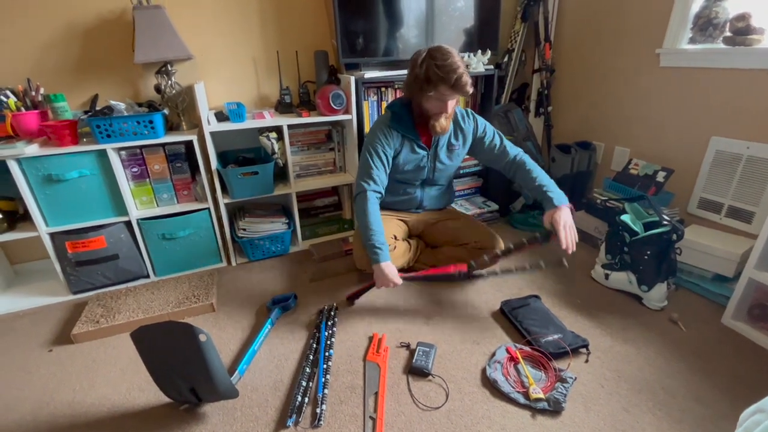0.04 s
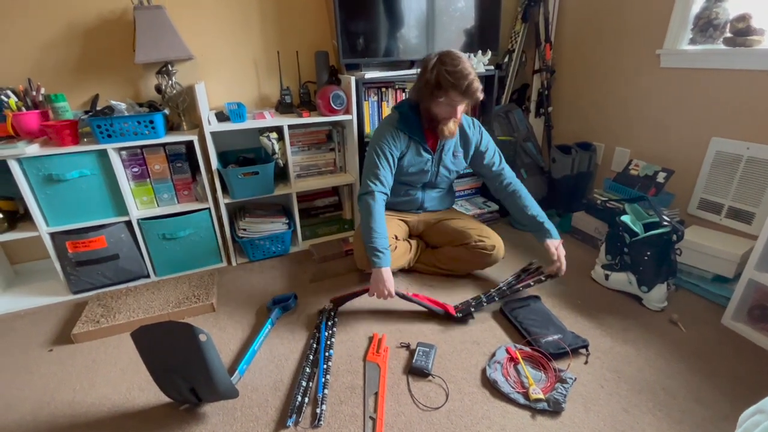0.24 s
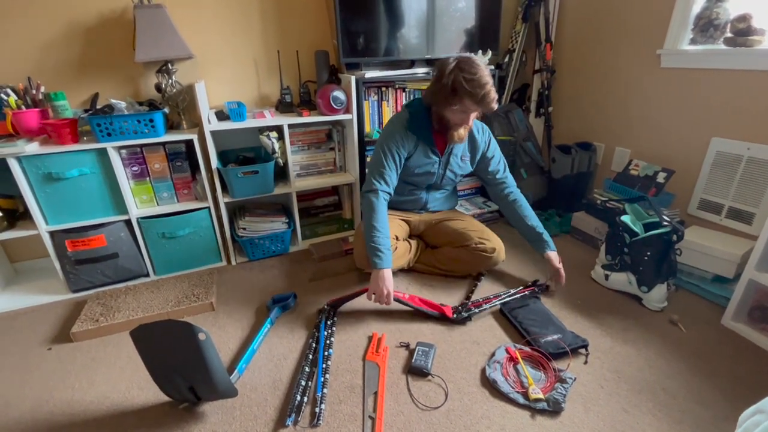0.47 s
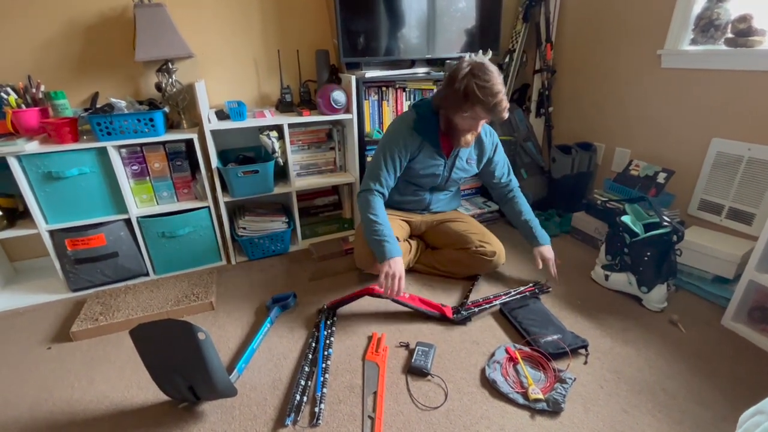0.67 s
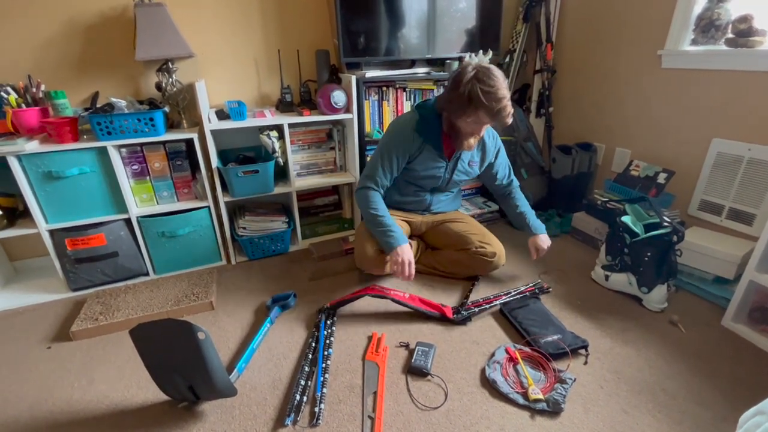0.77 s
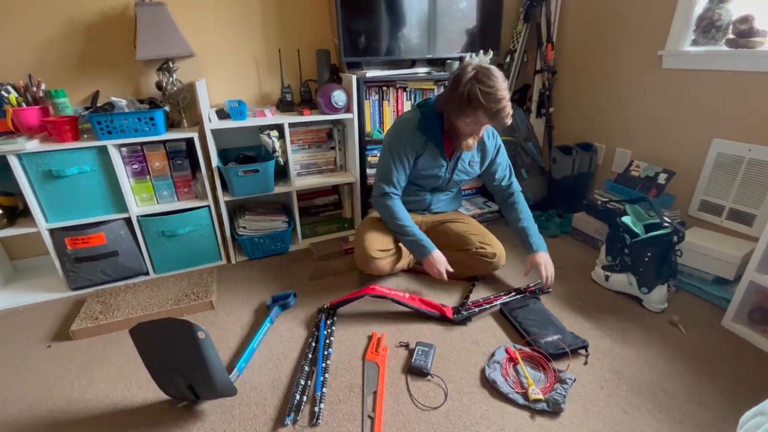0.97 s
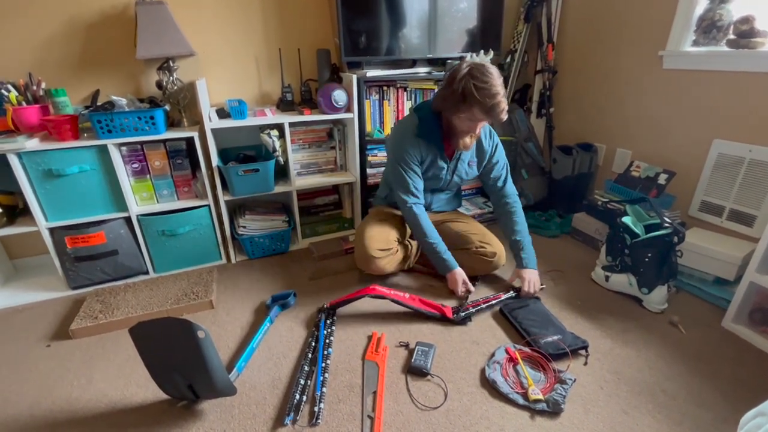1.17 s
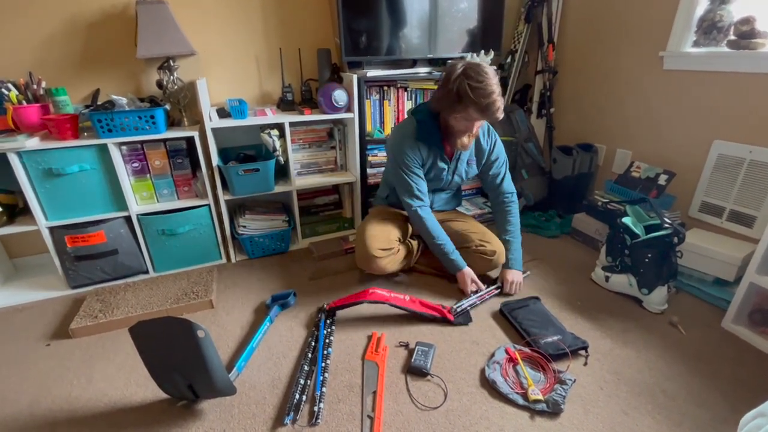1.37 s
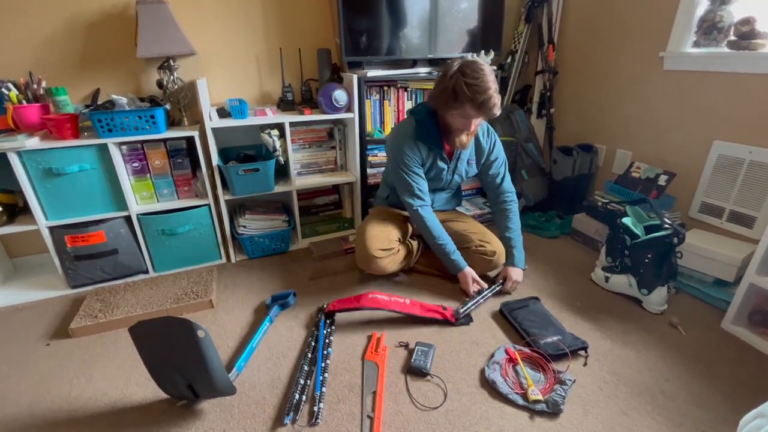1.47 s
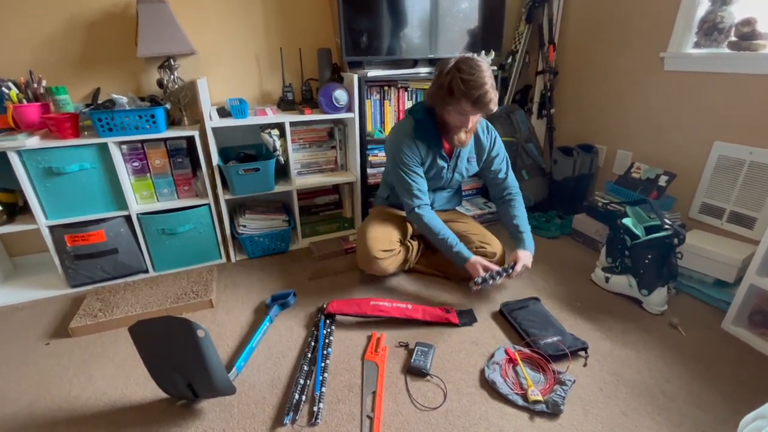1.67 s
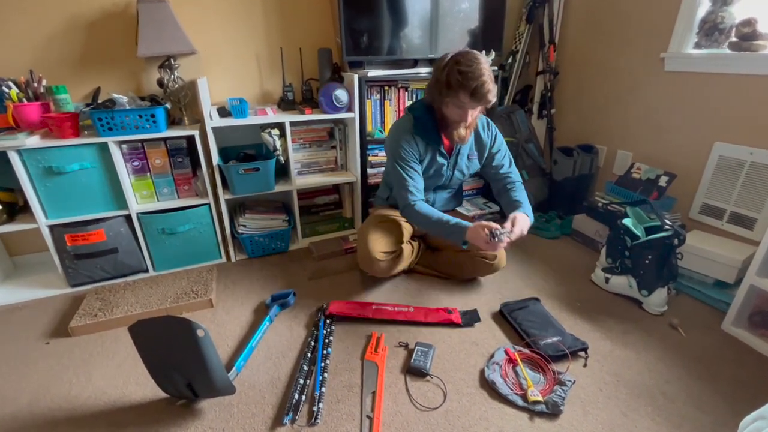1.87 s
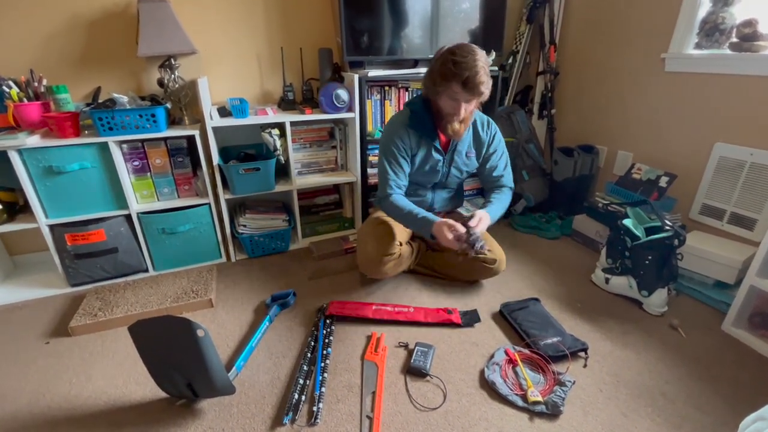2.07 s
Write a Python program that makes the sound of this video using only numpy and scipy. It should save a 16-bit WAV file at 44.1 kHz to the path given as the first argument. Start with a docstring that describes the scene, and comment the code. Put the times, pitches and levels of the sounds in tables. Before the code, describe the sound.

Thin metal tubes knock together from the start, landing on carpet at about 0.1 s with a loud bright clatter and dull thud. A smaller bounce follows at 0.35 s, light clicks near 0.5 s, then near quiet. Cloth rustles softly around 0.9 s. From 1.1 s to the end, at about 2 s, hands rub and gather the tubes with short irregular clinks. Small room, faint low hum and hiss.

```python
"""Aluminium tubes dropped and gathered

A bundle of thin tube segments drops on a carpet, bounces, then is gathered up by hand in a small room.
Each knock chatters briefly and excites the bending modes of several slightly unlike tubes; small ticks
rattle between knocks. Damped tones make the landing thuds and shaped noise the cloth rustle, hand rub,
house hum and hiss. Two microphone ports hear it with their own colour."""
import sys
import numpy as np
from scipy import signal
from scipy.fft import rfft, irfft
from scipy.io import wavfile
from scipy.ndimage import uniform_filter1d

SR = 44100
rng = np.random.default_rng(int(sys.argv[2]) if len(sys.argv) > 2 else 0)


def to_wav(sig):
    """Store sig (one row per channel, or 1-D mono) as 16-bit WAV at the path in sys.argv[1].

    Samples outside -1..1 are clipped; the rate is SR.
    """
    pcm = np.clip(np.atleast_2d(sig), -1, 1) * 32767
    pcm = np.round(pcm).astype(np.int16)
    wavfile.write(sys.argv[1], SR, pcm.T)  # frames by channels


N = 93668  # samples

# Hum spectrum: [f/Hz, relative spectral level/dB]
HUM_SPECTRUM = [(25, -39.5), (43, -2.5), (108, 7.5), (167, -4.5), (237, -7), (454, -24.5), (600, -58)]
# Hiss spectrum: [f/Hz, relative spectral level/dB]
HISS_SPECTRUM = [(240, -71), (400, -33.5), (2030, -23.5), (2290, -22.5), (11900, -34), (15500, -57.5)]
HUM_DB, HISS_DB = -62.5, -66  # rms; the hum then wavers about its level
# Cloth rustle envelope, before its random wander: [t/s, rms level/dB]
RUSTLE_ENVELOPE = [(0.601, -91), (.8, -69.5), (.9, -59), (.96, -56), (1.074, -60.5)]
# Cloth noise spectrum: [f/Hz, relative spectral level/dB]
RUSTLE_SPECTRUM = [(150, -41), (250, -5.5), (692, -8), (897, -11), (1180, -2), (1990, -4.5), (9390, -3.5),
                   (12800, -13.5), (15500, -39)]
# Hands sliding on carpet and tubes: centre and spread in s, noise rms in dB before the swell, band in Hz
RUB_S, RUB_SPREAD_S, RUB_DB, RUB_BAND_HZ = 1.183, 0.073, -63, (183, 600)

# Bundle landing on the carpet: [t/s, amplitude before envelope and room/dB, f/Hz, t60/s]
LANDINGS = [(.1105, -8.5, 710, 0.01), (.122, -37.5, 528.5, 0.2), (0.118, -36.5, 155.6, 0.1),
            (0.139, -24.5, 238, 0.043), (0.151, -32.5, 91, 0.047), (0.346, -29.5, 257.6, 0.045),
            (0.362, -44, 101, .12)]

# Bending modes of one tube: [f/Hz, relative level/dB]
TUBE_MODES = [(1030, -6), (1500, -23.5), (2050, 2), (2750, -39), (3200, 7.5), (3850, -34), (4750, 10.5),
              (5300, 9), (6000, 10), (6800, 13.5), (8600, 6), (9300, 5.5), (10900, -6.5), (13200, -1.5)]
# Loose tubes jostling, level before the room: [t/s, level/dB]
RATTLE_ENVELOPE = [(0.044, -39.5), (0.095, -45.5), (0.109, -27), (0.201, -42), (0.3, -43.5), (.335, -50),
                   (0.411, -38), (0.502, -70), (1.159, -86), (1.245, -40), (1.28, -44), (1.35, -40.5),
                   (1.585, -61), (1.6, -47), (1.654, -60.5), (1.718, -52), (1.885, -70), (1.911, -49),
                   (1.98, -72.5), (2.04, -52.5)]
TICKS_PER_S, TICK_SCATTER_DB = 1100, 3.5  # the scatter sets an exponential spread of levels
# Knocks of tube on tube, peak before the low cut and room; the rows at 0.1233 s and 1.3227 s are # strong near-
# wall reflections of the knocks about 11 ms before them: # [t/s, peak level/dB, low-mode level/dB, high-mode
# level/dB, most strongly struck f/Hz]
TUBE_KNOCKS = [(0.0004, -17, -3, -1, 6300), (0.0229, -13, -5, 12.5, 10140), (0.1123, -3.5, 6, 12.5, 9100),
               (0.1233, -7.5, -35, 8, 10040), (0.1358, -15, 11.5, -18, 6960), (0.1465, -9.5, -11, 28, 8900),
               (0.1612, -21, 8, 10, 9050), (0.2156, -15, -3, 9, 3330), (0.2403, -19.5, 6, 10, 3100),
               (0.3435, -9, -4.5, 15, 6000), (0.3526, -18.5, 0, 40, 8240), (0.356, -16.5, -12, -14.5, 5300),
               (0.4877, -20, 0.5, -1.5, 3370), (0.5136, -25, 9.5, 11, 3070), (0.6787, -44, 23.5, 22, 2900),
               (1.0806, -21.5, 2.5, 4.5, 3060), (1.1707, -17, 4, 12.5, 4480), (1.2525, -22.5, 7, 13, 5230),
               (1.293, -18.5, 13, 12.5, 4690), (1.3115, -15, -4, 5.5, 8770), (1.3227, -24.5, 6, -11, 2980),
               (1.3728, -15.5, -10.5, 12.5, 9100), (1.3918, -13, 10.5, 16, 4870),
               (1.4537, -17, -14, -7, 3550), (1.5139, -17, -1, 14, 9600), (1.5225, -23.5, -5.5, -6, 5070),
               (1.6047, -20.5, -1, 3.5, 6060), (1.6435, -27, 10, 4, 4700), (1.7296, -20, -4, 9.5, 9260),
               (1.7327, -13.5, -6, 12.5, 4920), (1.7553, -24.5, 12, 10, 4570), (1.8364, -34, 2, -7, 6800),
               (1.9703, -40, -8, 10, 4690), (2.0119, -26, -7, 4, 2050), (2.0712, -18, -11.5, 8, 4950)]
# Contact crack spectrum: [f/Hz, relative spectral level/dB]
CRACK_SPECTRUM = [(600, -43), (1400, 3), (2030, 5.5), (8090, -6.5), (8940, 5.5), (13300, -56),
                  (16000, -46.5)]
SEGMENTS = 7  # tubes ringing in each knock
DETUNE, GRIP_DETUNE = .035, .025  # fractions of f: tube to tube, and knock to knock
MODE_SCATTER_DB, PORT_SCATTER_DB = 4, 4.5
LOW_HZ, HIGH_HZ = 3600, 7600  # edges of the low-mode and high-mode groups
STRUCK_DB, STRUCK_OCTAVES = 8, .13  # emphasis around the most strongly struck frequency
RING_T60_S = .028  # at 3 kHz; longer below, shorter above
CRACK_DB, CRACK_S = -3, .0004  # peak relative to the ring's peak, time constant
CONTACT_S = .0003  # onset time of a ring
CLUSTER_S, CHATTER_S, CHATTER_DB = .0018, .016, -15  # mean delays; largest chatter contact

# Port colour, half applied to each side: [f/Hz, left minus right level/dB]
PORT_COLOUR = [(250, -2), (700, -6), (2000, -5), (4400, 14), (8100, -10), (13000, -0.5)]
PORT_LAG_S = .0004  # direct sound arrives later at the left port
ROOM_DB, ROOM_T60_S, ROOM_TREBLE_T60_S = -1.5, .22, .23  # reflected level relative to direct
WALL_S, WALL_SPREAD_S, WALL_DB = .0112, .0016, 5  # bunch of near echoes
TOP_HZ = 16300


def undb(db):
    """Logarithmic level: 20 dB is a factor of ten in amplitude."""
    return 10 ** (np.asarray(db) / 20)


def colour(x, table, share=1):
    """Linear filtering: weight the spectrum by levels interpolated over log frequency."""
    hz, db = np.array(table).T
    n = x.shape[-1]
    f = np.maximum(np.arange(n // 2 + 1) * SR / n, 1)
    # below the first point the level steps down 4 dB
    gain_db = np.interp(np.log(f), np.log(hz), db, left=db[0] - 4.0)
    return irfft(rfft(x) * undb(share * gain_db), n)


def level(x, db):
    """Mean-square normalisation: set the rms level."""
    return x * undb(db) / np.sqrt(np.mean(x ** 2))


def walk(rate):
    """Low-passed randomness: twice-averaged noise wanders smoothly with unit rms."""
    k = int(SR / rate)
    smooth = uniform_filter1d(rng.standard_normal(N), k)
    return level(uniform_filter1d(smooth, k), 0)


def decay(t, t60):
    """Exponential damping: amplitude falls 60 dB in t60."""
    return np.exp(-np.log(1000) * t / t60)


def add(out, x, s):
    """Superposition: sum a sound into the output from time s."""
    i = int(s * SR)
    out[..., i:i + x.shape[-1]] += x[..., :N - i]


def background():
    """Partial coherence: a wavering low hum mostly shared by both ports, over independent hiss."""
    mid, side = colour(rng.standard_normal((2, N)), HUM_SPECTRUM)
    stereo_hum = mid + .4 * side * np.array([[1], [-1]])
    hum = level(stereo_hum, HUM_DB) * undb(2 * walk(6))
    hiss = level(colour(rng.standard_normal((2, N)), HISS_SPECTRUM), HISS_DB)
    return hum + hiss


def rustle():
    """Modulated friction noise: grainy cloth sound as the arms move."""
    s, db = np.array(RUSTLE_ENVELOPE).T
    envelope_db = np.interp(np.arange(N) / SR, s, db, left=-120, right=-120)
    envelope = undb(envelope_db + 2.0 * walk(36))
    return level(colour(rng.standard_normal((2, N)), RUSTLE_SPECTRUM), 0) * envelope


def rub():
    """Sliding friction: a dull uneven band of noise swells while the bundle is gathered."""
    band = signal.butter(2, RUB_BAND_HZ, "band", fs=SR, output="sos")
    noise = signal.sosfilt(band, rng.standard_normal((2, N)))
    swell = np.exp(-((np.arange(N) / SR - RUB_S) / RUB_SPREAD_S) ** 2)
    return level(noise, RUB_DB) * swell * undb(4.9 * walk(34))


def thuds():
    """Damped oscillation: each landing is a decaying tone blurred by a random phase walk."""
    out, t = np.zeros(N), np.arange(8000) / SR
    for s, db, hz, t60 in LANDINGS:
        wobble = np.cumsum(rng.standard_normal(len(t))) * 0.0034  # rad
        tone = np.sin(2 * np.pi * hz * t + wobble)
        onset = 1 - np.exp(-t / 0.003)
        add(out, undb(db) * tone * onset * decay(t, t60), s)
    return out


def ring_t60(hz):
    """Frequency-dependent damping: decay time falls as the inverse root of frequency."""
    return RING_T60_S * np.sqrt(3000 / hz)


def rattle():
    """Random impulse excitation: six tick trains each ring their own detuned set of tubes."""
    out, t, groups = 0, np.arange(2000) / SR, 6
    s, level_db = np.array(RATTLE_ENVELOPE).T
    hz, db = np.repeat(np.array(TUBE_MODES), 3, axis=0).T
    fades = decay(t, ring_t60(hz)[:, None])
    for _ in range(groups):
        u, mode = rng.random((2, N)), rng.standard_normal((3, len(hz)))
        tick_size = undb(-TICK_SCATTER_DB * np.log(1 - u[1]))
        ticks = (u[0] < TICKS_PER_S / groups / SR) * tick_size
        mode_hz = hz * (1 + DETUNE * mode[0])
        rings = np.sin(2 * np.pi * mode_hz[:, None] * t) * fades
        port_gains = undb(db + 2 * PORT_SCATTER_DB * mode[1:])
        out = out + signal.fftconvolve(ticks[None], port_gains @ rings, axes=1)[:, :N]
    return level(out, 0) * undb(np.interp(np.arange(N) / SR, s, level_db))


def strike_tilt(f, low_db, high_db, struck_hz):
    """Selective excitation: a strike weights low modes, high modes and a narrow struck region, in dB."""
    low = low_db / (1 + (f / LOW_HZ) ** 6)
    high = high_db / (1 + (HIGH_HZ / f) ** 8)
    struck = STRUCK_DB * np.exp(-(np.log2(f / struck_hz) / STRUCK_OCTAVES) ** 2)
    return low + high + struck


def contacts():
    """Repeated impact: a cluster of contacts and a faint dense chatter follow the first blow."""
    u, train = rng.random((3, 60)), np.zeros(5000)
    in_cluster = np.arange(60) < 9
    when = -np.log(1 - u[0]) * np.where(in_cluster, CLUSTER_S, CHATTER_S)
    size = np.where(in_cluster, .8, undb(CHATTER_DB)) * u[1] * np.sign(u[2] - .5)
    np.add.at(train, np.clip(when * SR, 0, 4999).astype(int), size)
    train[0] = 0.93  # first blow
    return train


def knocks():
    """Modal superposition: contacts convolved with tube rings and a short noisy crack, then a low cut."""
    out, t = np.zeros((2, N)), np.arange(3000) / SR
    hz, db = np.repeat(np.array(TUBE_MODES), SEGMENTS, axis=0).T
    hz = hz * (1 + DETUNE * rng.uniform(-0.82, 1, len(hz)))
    fades = decay(t, ring_t60(hz)[:, None]) * (1 - np.exp(-t / CONTACT_S))
    crack_t = t[:2048]
    crack_shape = crack_t * np.exp(-crack_t / CRACK_S)
    for s, peak_db, low_db, high_db, struck_hz in TUBE_KNOCKS:
        strike = low_db, high_db, struck_hz
        mode = rng.standard_normal((4, len(hz)))
        train = contacts()
        noise = rng.standard_normal((2, 2048))
        mode_hz = hz * (1 + GRIP_DETUNE * mode[0])
        rings = np.sin(2 * np.pi * mode_hz[:, None] * t) * fades
        mode_db = db + strike_tilt(hz, *strike) + MODE_SCATTER_DB * mode[1]
        ring = undb(mode_db + PORT_SCATTER_DB * mode[2:]) @ rings
        ring /= np.abs(ring).max()
        spectrum = [(f, d + strike_tilt(f, *strike)) for f, d in CRACK_SPECTRUM]
        crack = colour((noise[0] + .5 * noise) * crack_shape, spectrum)  # partly shared by the ports
        ring[:, :1024] += undb(CRACK_DB) * crack[:, :1024] / np.abs(crack).max()
        hit = signal.fftconvolve(ring, train[None], axes=1)
        add(out, undb(peak_db) * hit / np.abs(hit).max(), s)
    return signal.sosfilt(signal.butter(3, 450, "high", fs=SR, output="sos"), out)


def room(x):
    """Reverberation: direct sound, a scattered bunch of near echoes and a two-band decaying noise tail."""
    t = np.arange(22000) / SR
    noise = rng.standard_normal((2, len(t)))
    low = signal.sosfilt(signal.butter(2, 3000, fs=SR, output="sos"), noise)
    tail = low * decay(t, ROOM_T60_S) + (noise - low) * decay(t, ROOM_TREBLE_T60_S)
    tail *= np.clip(2 * t / WALL_S, 0, 1)  # reflections build up gradually
    tail *= 1 + undb(WALL_DB) * np.exp(-((t - WALL_S) / WALL_SPREAD_S) ** 2)
    tail *= undb(ROOM_DB) / np.sqrt(np.sum(tail ** 2, axis=1, keepdims=True))
    tail[0, int(PORT_LAG_S * SR)] += 1
    tail[1, 0] += 1
    return signal.fftconvolve(x, tail, axes=1)[:, :N]


def scene():
    """Superposition at two ports: opposite colour on the tubes, cross-mixed thuds, and the dry noises."""
    tubes = room(knocks() + rattle())
    bumps = room(thuds()[None])
    left = colour(tubes[0], PORT_COLOUR, .5)
    right = colour(tubes[1], PORT_COLOUR, -.5)
    mixed_bumps = 0.67 * bumps + 0.35 * bumps.sum(axis=0)
    return np.array([left, right]) + mixed_bumps + rustle() + rub() + background()


def record(dry):
    """Saturation and band limiting: the recorder rounds the loudest peaks and cuts the top."""
    low_pass = signal.ellip(10, .2, 80, TOP_HZ, fs=SR, output="sos")
    return signal.sosfilt(low_pass, np.tanh(dry))


dry = scene()
out = record(dry)
to_wav(out)
```